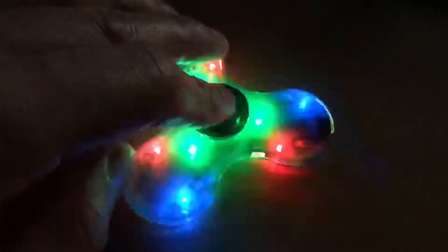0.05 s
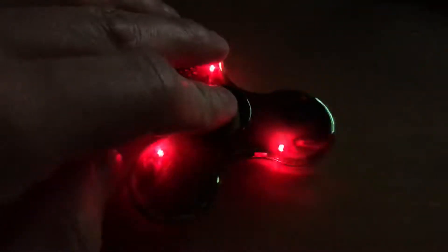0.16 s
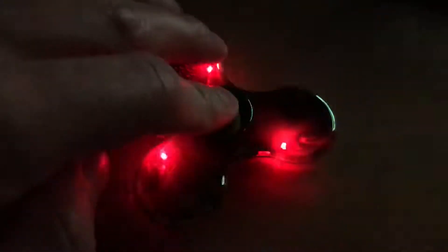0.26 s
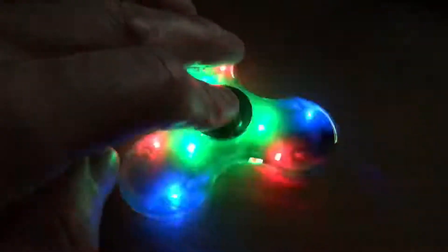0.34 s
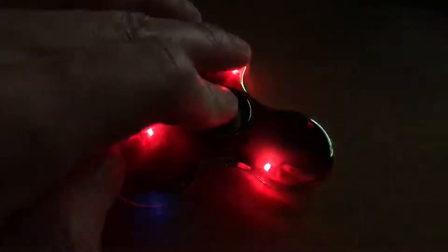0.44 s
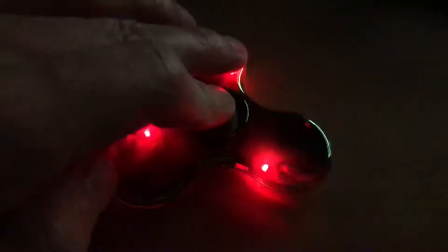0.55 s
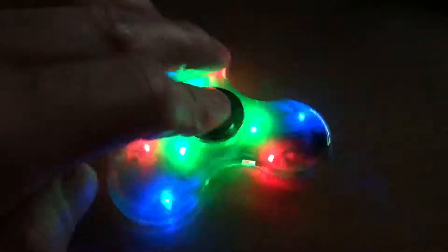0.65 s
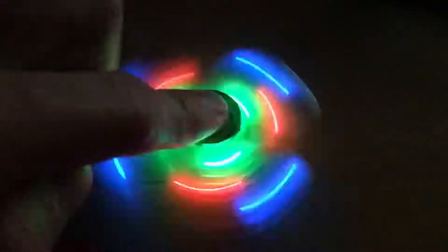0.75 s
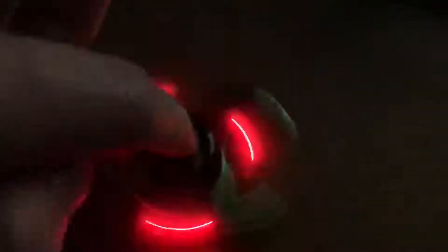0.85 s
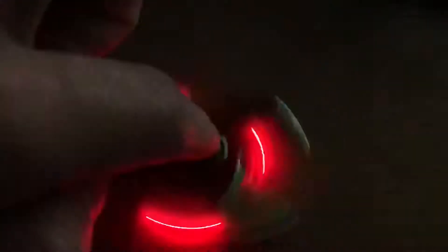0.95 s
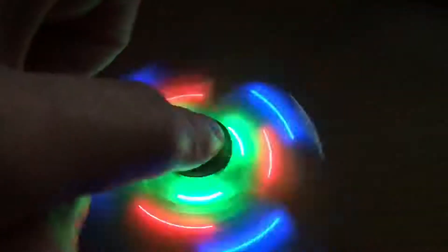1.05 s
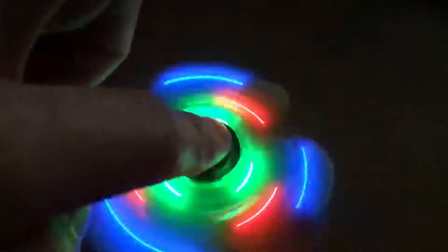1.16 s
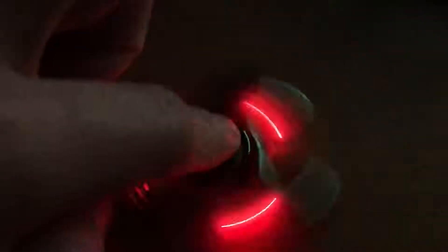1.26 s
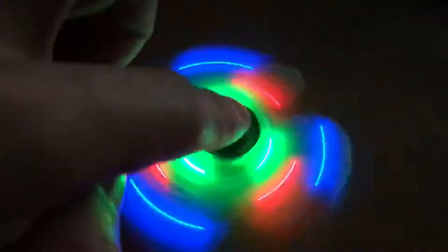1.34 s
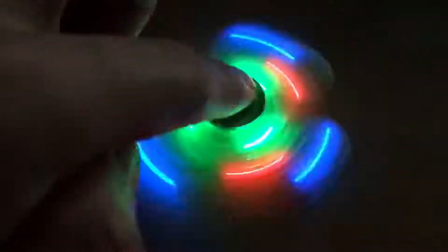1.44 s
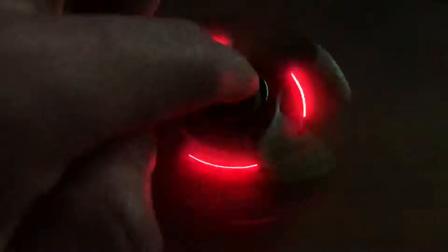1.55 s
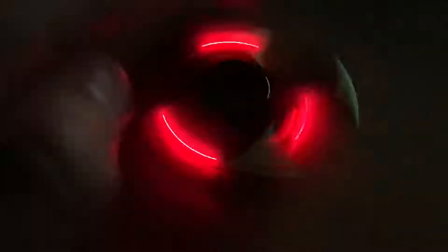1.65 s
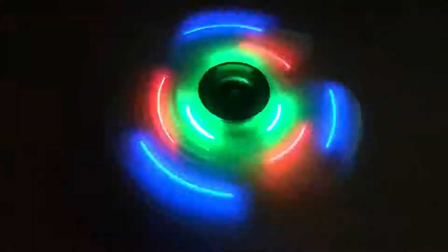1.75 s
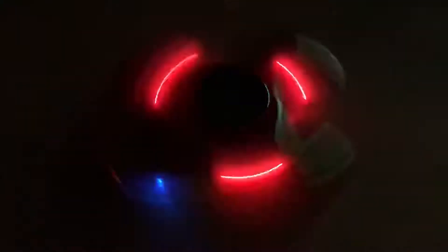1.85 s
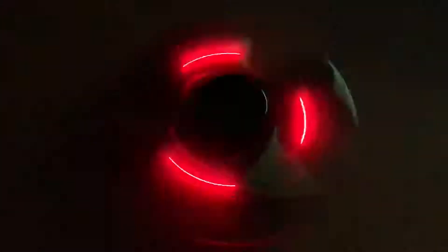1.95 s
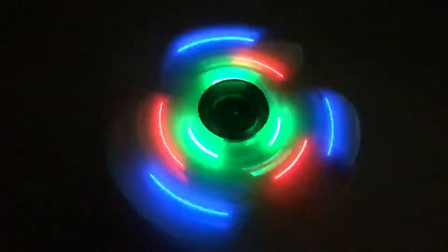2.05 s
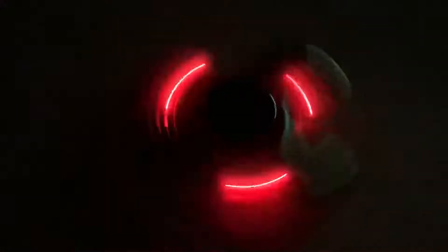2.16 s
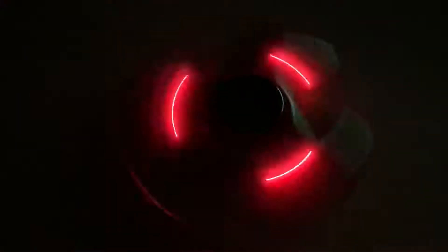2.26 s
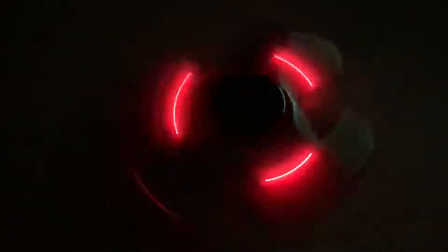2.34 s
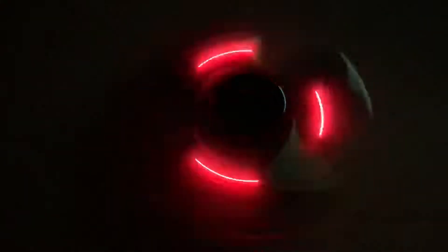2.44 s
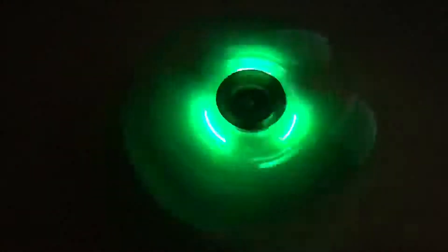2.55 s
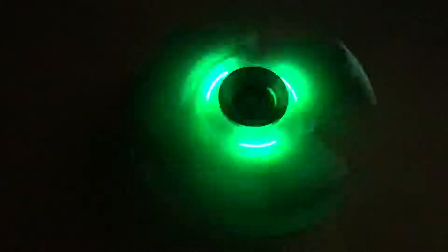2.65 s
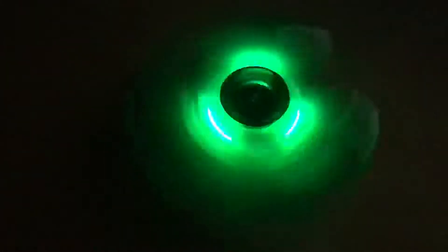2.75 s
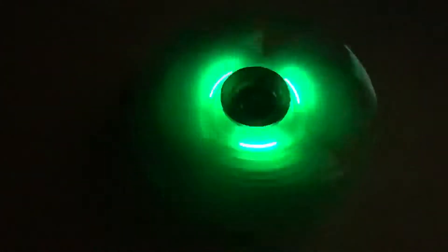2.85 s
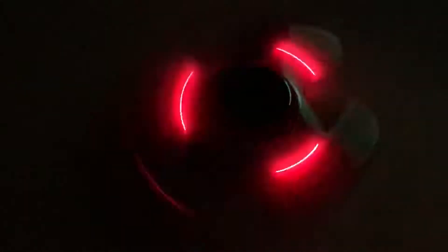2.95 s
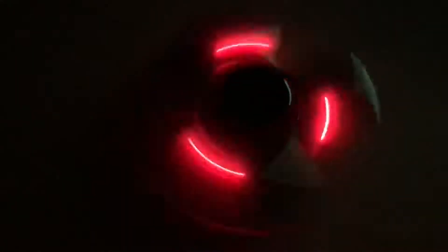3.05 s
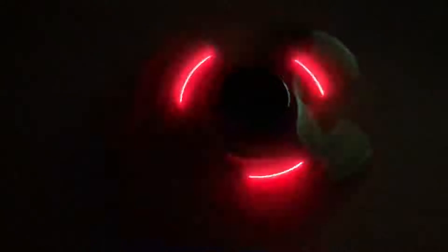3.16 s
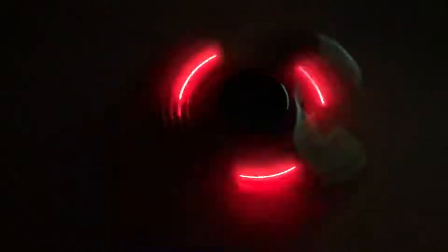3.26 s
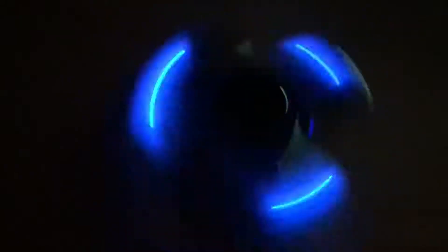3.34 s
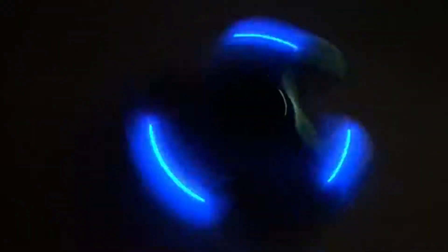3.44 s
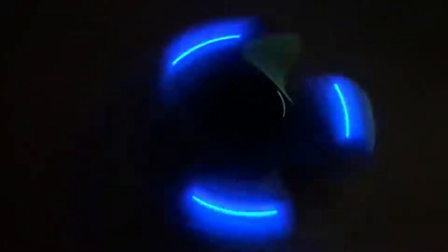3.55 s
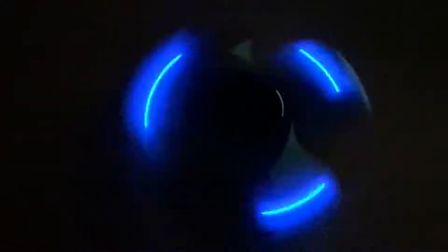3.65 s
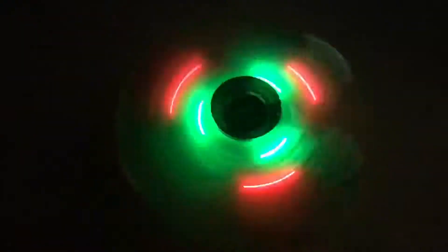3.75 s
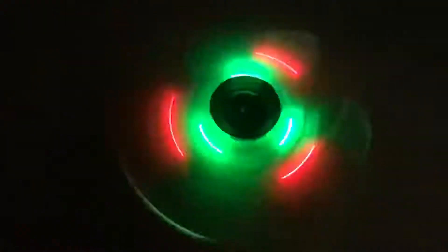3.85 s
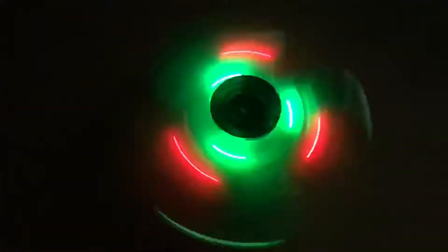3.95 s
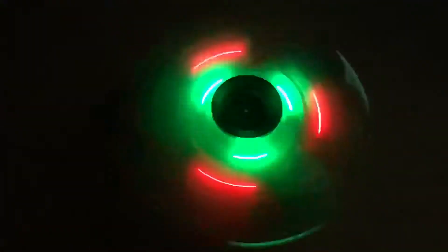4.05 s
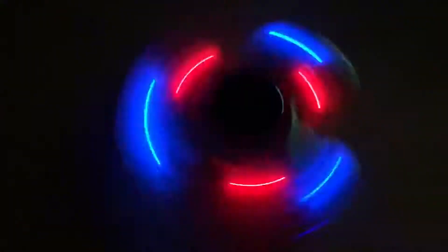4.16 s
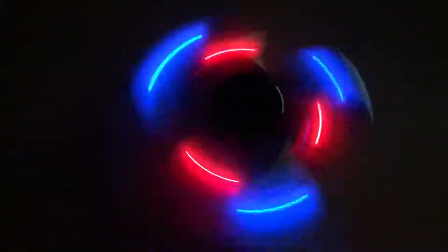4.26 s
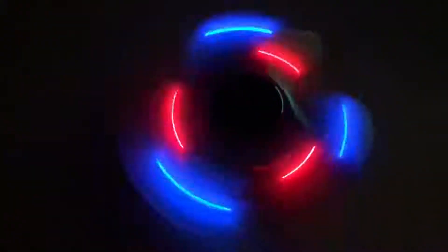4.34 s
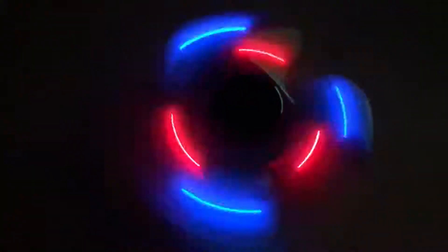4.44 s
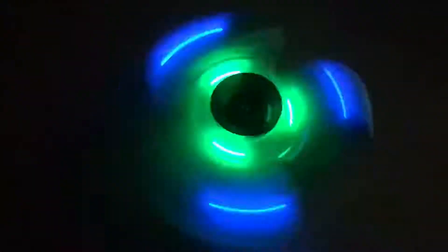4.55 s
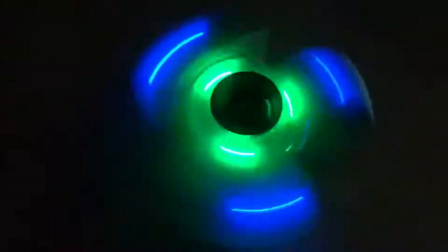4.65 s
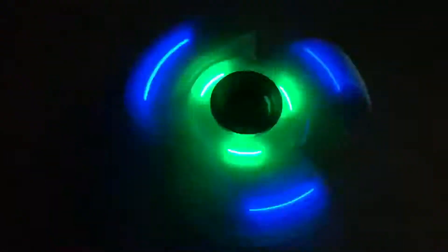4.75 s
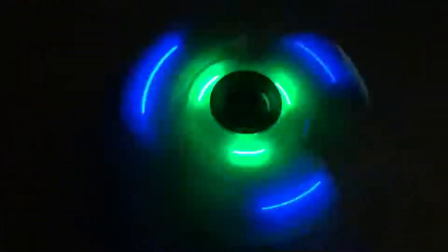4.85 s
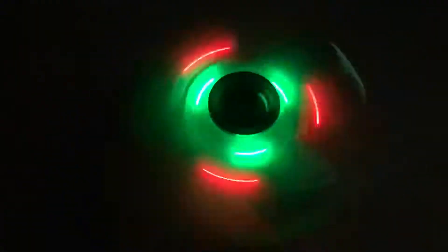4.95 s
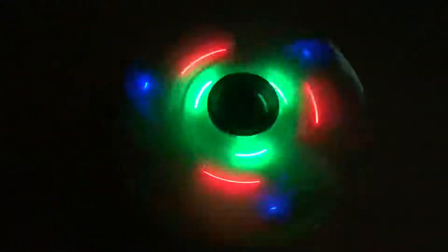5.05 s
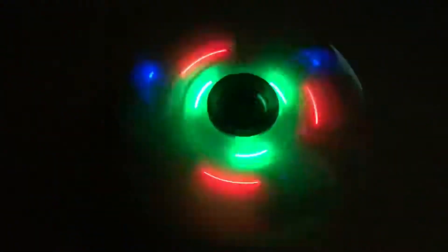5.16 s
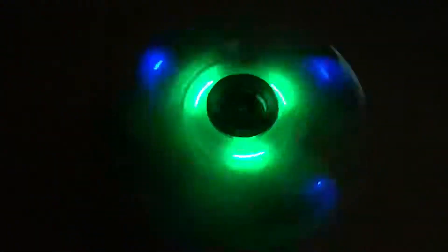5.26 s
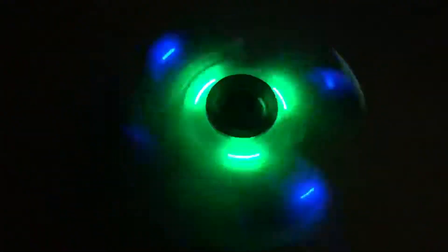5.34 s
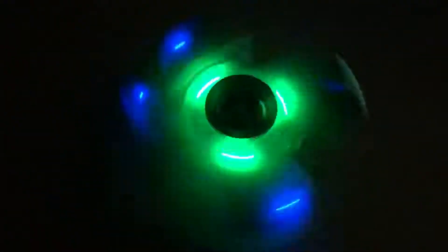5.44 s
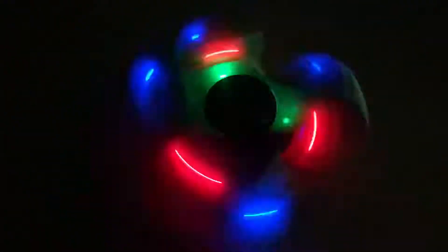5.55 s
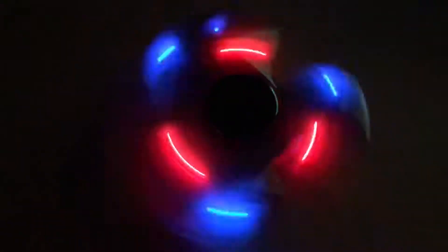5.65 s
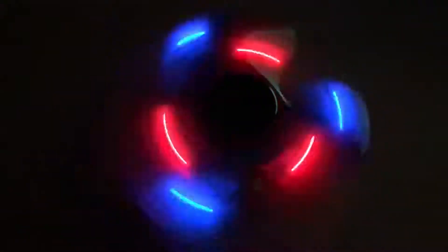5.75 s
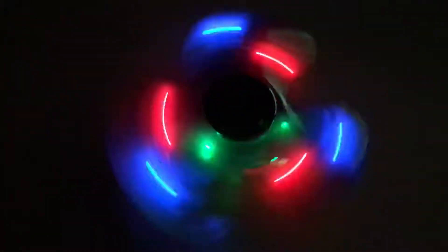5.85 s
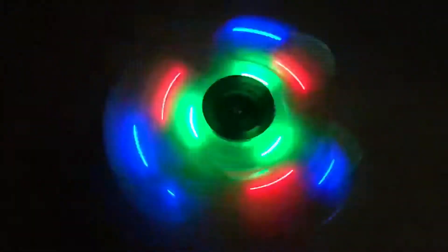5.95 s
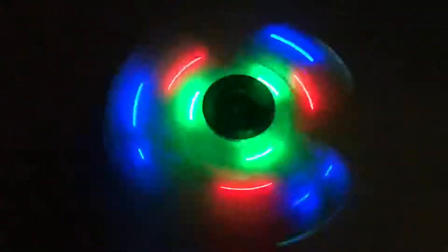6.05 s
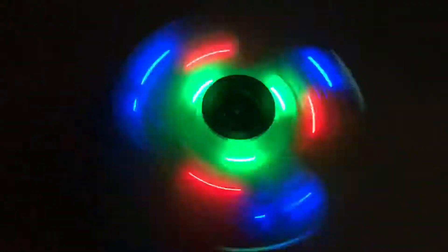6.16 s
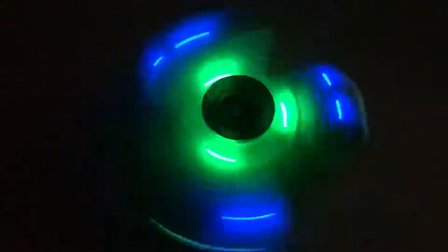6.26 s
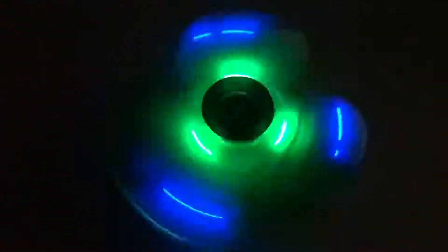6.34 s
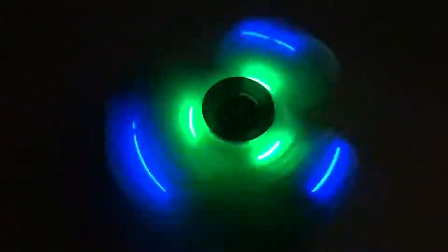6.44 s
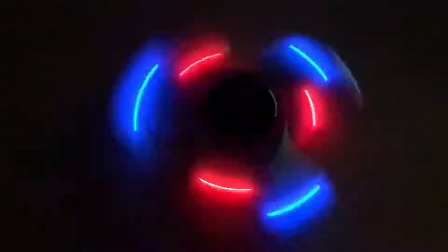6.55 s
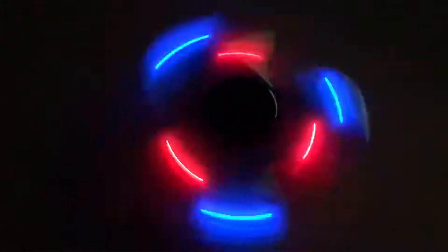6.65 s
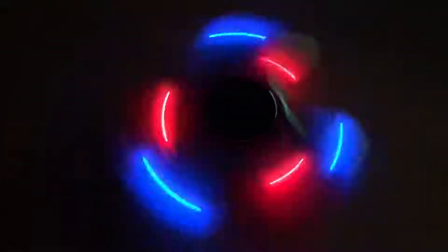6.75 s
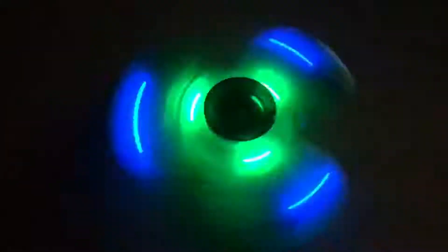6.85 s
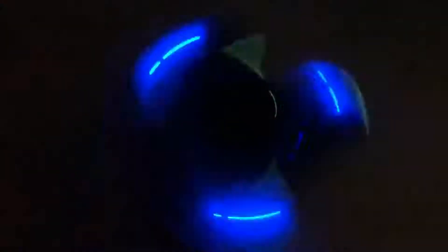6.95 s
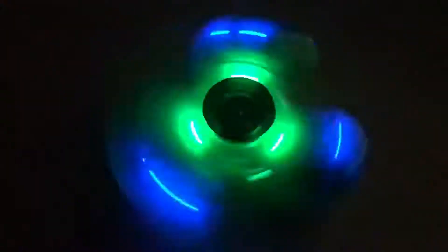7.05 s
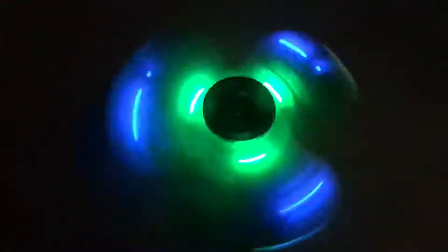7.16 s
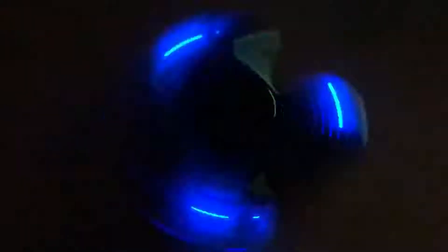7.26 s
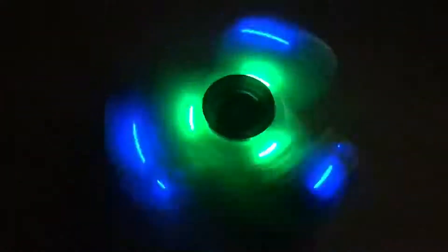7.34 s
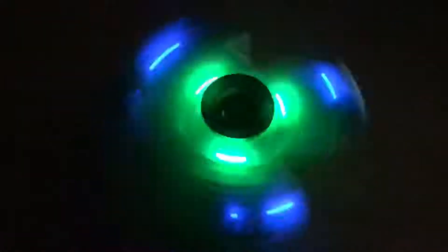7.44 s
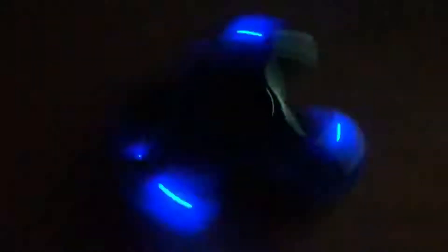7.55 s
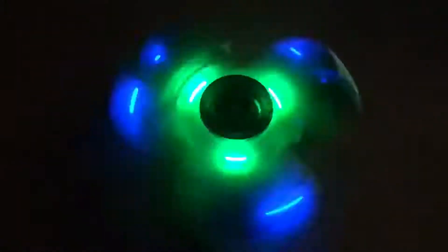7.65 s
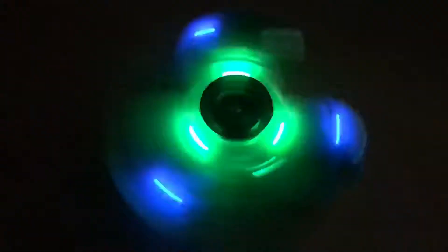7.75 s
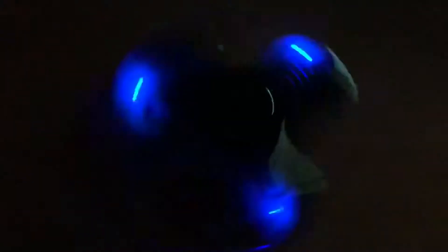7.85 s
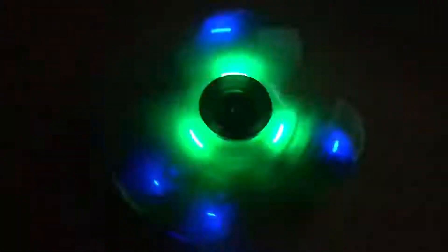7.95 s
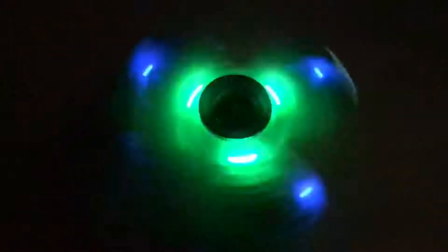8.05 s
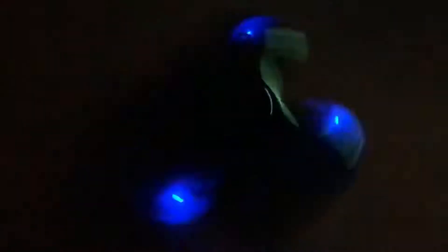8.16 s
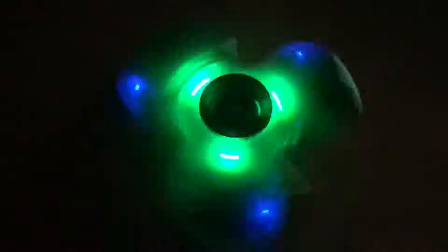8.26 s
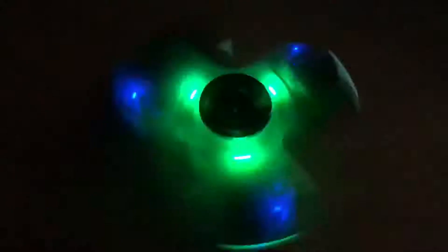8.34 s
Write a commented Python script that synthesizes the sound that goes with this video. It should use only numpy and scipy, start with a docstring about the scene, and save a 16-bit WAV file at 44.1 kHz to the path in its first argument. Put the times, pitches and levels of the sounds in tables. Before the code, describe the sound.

A quiet small room holds a soft low electric hum and faint noise. Very close, at about 0.6 seconds, a fingernail gives a faint bright tick on a plastic spinner, with another near 0.8. Immediately afterwards, around 0.82 to 0.86, a sharp snap and hard plastic clacks burst out, by far the loudest moment, with a dull thud in the hand. Short skin scuffs and low bumps follow until about 1.2. The bearing is already whirring: thin high metallic ringing, airy hiss and a fast flutter about twenty times a second. The thumb lets go around 1.6 and the plastic rattle becomes clearer, swelling slowly; a last brief rub and small clack come at 2.0. Until about 8.4 seconds the whir continues, warbling slightly, dotted with tiny irregular ticks, gradually slower, softer and less grinding, still turning at the end.

```python
"""A low electric hum in a quiet room; close to the microphone a fingernail taps a plastic fidget spinner, then flicks it.
The finger snaps off an arm (ringing modes), the body clacks and skin slides on the cap (bursts of coloured noise).
The ball bearing whirs on, fading as it slowly loses speed: balls tick over rough spots and the metal rings thinly.
The plastic body rattles twice a turn, damped under the thumb; once the thumb lets go, it rattles in slow swells."""
import sys
import numpy as np
from scipy import signal
from scipy.fft import rfft, irfft, next_fast_len
from scipy.io import wavfile
from scipy.ndimage import map_coordinates

SR = 44100
rng = np.random.default_rng(int(sys.argv[2]) if len(sys.argv) > 2 else 0)


def dump(signal):
    """Clip the signal to [-1, 1] and save it as 16-bit WAV at the path in sys.argv[1]."""
    limited = np.clip(np.atleast_2d(signal).T, -1, 1)
    pcm = np.round(limited * 32767).astype(np.int16)
    wavfile.write(sys.argv[1], SR, pcm)


N = 370440

# the flick starts the rotor; later the thumb comes off the cap; both changes ramp in
FLICK_S, LET_GO_S, CHANGE_S = .84, 1.606, 0.036

# cycles of the turning rotor: (rate [times per turn], place of the peak in its cycle [0-1])
# its lean, its rocking, the grazing of the balls, and the beat of the rocking with the passing balls
LEAN, ROCK, GRAZE, BEAT = (1, .89), (2, .655), (2, .41), (2.885, .55)
# the ring's pitch swings once and twice a turn, each by a share of the playing speed
WARBLE_ONCE, WARBLE_TWICE = (1, .21), (2, .8)
WARBLE_ONCE_SHARE, WARBLE_TWICE_SHARE = .015, 0.0092
# eight balls load the inner race, and pass a spot on the inner and on the outer race
INNER_LOAD, INNER_PASS, OUTER_PASS = (4.885, .94), (4.885, .03), (3.115, .06)

# sounds that grow with speed: (level at the cruising speed [dB], rise for each turn per s [dB])
CRUISE_TURNS_PER_S = 10
RING_LEVEL, HISS_LEVEL, SKID_LEVEL = (-55.5, 0.87), (-57.5, 1.2), (-78, 5)
LOW_RATTLE_LEVEL, HIGH_RATTLE_LEVEL = (-64.5, 0.14), (-62.5, 1.17)
# while the thumb holds the cap it damps the rattle and the hiss
HELD_LOW_DB, HELD_HIGH_DB, HELD_HISS_DB = -2, -7.5, -2
# the free toy wobbles slowly, and the rattle swells with it: (rate [times per s], place of the peak [0-1])
WOBBLE = (1.36, .28)
WOBBLE_DB = 1.5
# letting go jogs the toy: the upper rattle is louder at first, by at most this, and settles
JOG_DB, SETTLE_S = 3, 0.47
# now and then a passing ball catches and gives a light tick; the level is that of its kick
CATCH_CHANCE, CATCH_DB = .06, -40

# resonances of the bearing: (frequency [Hz], width [Hz], relative level [dB])
BEARING_MODES = [(3088, 190, -10), (3180, 160, -12), (3732, 137, -4), (4100, 170, -12), (4160, 190, -13),
                 (4504, 154, 5.5), (4900, 150, -4)]
# a ball's impact loads the race, which answers lower: (frequency [Hz], width [Hz], relative level [dB])
LOADED_RACE_MODES = [(4075, 190, -5.5)]
# colour of the rolling hiss: (frequency [Hz], relative density [dB per Hz])
HISS_COLOUR = [(500, -24), (2700, -12.5), (4300, -9), (5200, -2.5), (6200, 2), (7000, -2), (7700, -11.5),
               (8300, -5.5), (9500, -8.5), (10500, -16), (11700, -15.5), (13000, -15.5), (14600, -12),
               (16000, -19)]
# colour of a dull thud in the hand: (frequency [Hz], relative density [dB per Hz])
THUD_COLOUR = [(20, -37), (32, -15), (60, -13), (160, 0.5), (300, -4), (500, -9.5), (900, -21), (2000, -34),
               (6000, -58)]


def from_db(db):
    """Decibels to gain."""
    return 10 ** (np.asarray(db) / 20)


def rms_one(x):
    """Scale to an rms of 1."""
    return x / np.sqrt(np.mean(x ** 2) + 1e-20)


def in_time(rows):
    """Each column of a curve at every sample."""
    s, *columns = np.transpose(rows)
    return [np.interp(np.arange(N) / SR, s, c) for c in columns]


def after(s):
    """A quick ramp from 0 to 1 that starts at the given time."""
    return np.clip((np.arange(N) / SR - s) / CHANGE_S, 0, 1)


def drift(rate):
    """A smooth random curve of rms 1 that changes about rate times a second."""
    knots = np.arange(N) / SR * rate
    return rms_one(np.interp(knots, np.arange(4096), rng.standard_normal(4096)))


def edge(x, hz, kind):
    """Butterworth high- or low-pass."""
    sos = signal.butter(N=4, Wn=min(hz, .45 * SR), btype=kind, fs=SR, output="sos")
    return signal.sosfilt(sos, x)


def coloured(x, spectrum):
    """Causal filter with the shape of the given spectrum; white noise keeps its power."""
    size = 2 * next_fast_len(N // 2 + SR // 10)
    hz, db = np.transpose(spectrum)
    bins = np.fft.rfftfreq(size, 1 / SR)
    gain = rms_one(from_db(np.interp(np.log(bins + 1), np.log(hz), db)))
    # the folded cepstrum gives the minimum phase
    cepstrum = irfft(np.log(gain))[:size // 2]
    response = np.exp(2 * rfft(cepstrum, size) - cepstrum[0])
    return irfft(rfft(x, size) * response)[:N]


def resonate(x, modes):
    """Parallel two-pole resonances of alternating sign."""
    out = np.zeros(N)
    for k, (hz, width, db) in enumerate(modes):
        r = np.exp(-np.pi * width / SR)
        poles = [1, -2 * r * np.cos(2 * np.pi * hz / SR), r * r]
        gain = (-1) ** k * from_db(db) * (1 - r * r) / 2
        out += gain * signal.lfilter([1, 0, -1], poles, x)
    return out


def grit(per_s, spread_db):
    """Tiny contacts at random moments, of uneven size; rms 1."""
    sizes = from_db(spread_db * np.minimum(rng.exponential(1, N), 4)) * rng.choice([-1, 1], N)
    return rms_one(sizes * (rng.random(N) < per_s / SR))


def clicks_at(rows):
    """One click for each (time [s], level [dB])."""
    out = np.zeros(N)
    for s, db in rows:
        out[round(s * SR)] = from_db(db)
    return out


def scrapes(kicks, length_s):
    """Each kick starts a brief decaying burst of friction noise."""
    decay = np.exp(-1 / (length_s * SR))
    # the tiny offset keeps the filter clear of denormal numbers
    return signal.lfilter([1], [1, -decay], kicks + 1e-18) * rng.choice([-1, 1], N)


def swing(position, cycle):
    """A load between -1 and 1 that recurs as the position (turns or seconds) advances."""
    rate, place = cycle
    return np.cos(2 * np.pi * (rate * position - place))


def at_speed(level, speed):
    """Level in dB of a sound that grows with the rotor's speed."""
    cruise_db, slope_db = level
    return cruise_db + slope_db * (speed - CRUISE_TURNS_PER_S)


def room(x, wet_db):
    """A short diffuse tail of decaying noise follows the close sound."""
    t60_s = 0.12
    age = np.arange(SR // 2) / SR
    tail = rng.standard_normal(len(age)) * 1000 ** (-age / t60_s) * (age > .002)
    tail = signal.lfilter(*signal.butter(1, 9000, fs=SR), tail)
    return x + from_db(wet_db) * signal.fftconvolve(x, tail / np.linalg.norm(tail))[:N]


def background():
    """Mains hum and a wavering low drone over the room's soft noise."""
    # hum lines: (frequency [Hz], width [Hz], level [dB])
    hum_lines = [(120.2, 0.31, -60.5), (179.8, 1.46, -64), (254.2, 9.9, -60)]
    # colour of the room's noise: (frequency [Hz], relative density [dB per Hz])
    room_colour = [(20, -31), (35, -3.5), (48, 1.5), (80, -3.5), (150, -0.5), (280, 5.5), (330, -4),
                   (370, 1.5), (480, -9.5), (560, -4), (690, -4), (800, -16), (1500, -19), (5200, -28),
                   (16000, -32.5)]
    t = np.arange(N) / SR
    out = from_db(-59) * coloured(rng.standard_normal(N), room_colour)
    for hz, width, db in hum_lines:
        unsteady = np.clip(width / 8, 0, 1)   # the wider a line, the less of it is a steady tone
        sway = 1 - unsteady + unsteady * (drift(2 * width) + 1j * drift(2 * width))
        out += from_db(db) * rms_one(np.real(sway * np.exp(2j * np.pi * hz * t)))
    return out


def nail():
    """A nail taps faintly as the finger finds its place; clicks excite damped resonances."""
    # a fingernail touches the arm before the flick: (time [s], level of the click [dB])
    nail_taps = [(.5768, -14.5), (.585, -26), (.795, -17)]
    # its resonances: (frequency [Hz], width [Hz], relative level [dB])
    nail_modes = [(5350, 290, 5), (7000, 700, -6.5), (13500, 4500, -14.5)]
    return resonate(clicks_at(nail_taps), nail_modes)


def touch():
    """Each rub swells and dies away; together they give sliding gain, rumble gain and bearing load in dB."""
    # fingers rub the cap: (peak time [s], rise [s], decay [s], sliding [dB],
    # low handling rumble [dB], extra load on the bearing [dB])
    rubs = [(0.852, 0.011, 0.028, -55, -38, 5), (0.896, 0.0056, 0.029, -48.5, -59, 12.5),
            (.962, 0.019, .02, -45.5, -47.5, 2.5), (1.095, .014, .022, -47, -45.5, 8.5),
            (1.16, 0.034, 0.046, -62, -52.5, -3), (1.51, 0.16, 0.096, -56.5, -79, 2),
            (1.998, 0.01, .018, -41, -53, 3), (2.13, 0.027, 0.053, -72, -62, 2)]
    t = np.arange(N) / SR
    slide, rumble, load_db = np.zeros((3, N))
    for s, rise_s, decay_s, slide_db, rumble_db, press_db in rubs:
        fall = np.where(t < s, ((s - t) / rise_s) ** 2 / 2, (t - s) / decay_s)
        pressure = np.exp(-np.minimum(fall, 20))
        slide += from_db(slide_db) * pressure
        rumble += from_db(rumble_db) * pressure
        load_db += press_db * pressure
    return slide, rumble, load_db


def fingers(slide, rumble):
    """Skin sticks and slips over the cap and jostles the toy."""
    # colour of skin sliding on plastic: (frequency [Hz], relative density [dB per Hz])
    skin_colour = [(200, -7), (1000, -8.5), (2000, -4), (4000, 0.5), (6500, -7), (9000, -6.5), (10700, -12),
                   (12500, -5), (14500, -8), (16000, -22)]
    slips = grit(per_s=2200, spread_db=4.5) * rms_one(from_db(3.6 * drift(110)))
    sliding = slide * coloured(slips, skin_colour)
    return sliding + rumble * coloured(rng.standard_normal(N), THUD_COLOUR)


def clacks():
    """Each knock is a brief chatter of plastic with a bright top and a dull thud in the hand."""
    # plastic clacks: (time [s], level of the burst [dB], t60 [s], thud relative to the clack [dB])
    clack_rows = [(0.8186, -29.5, 0.035, -11), (0.8424, -14, 0.022, -11), (0.8487, -23, 0.035, -19),
                  (0.8558, -10.5, 0.0048, -24), (0.8628, -40, 0.037, 6), (0.8766, -38, 0.054, 3.5),
                  (1.0554, -33.5, 0.02, -10), (1.985, -41, 0.027, -11)]
    # colour of a clack: (frequency [Hz], relative density [dB per Hz])
    clack_colour = [(200, -9.5), (700, -1.5), (1300, -5), (2000, -6.5), (3000, -8), (3700, -4), (4500, 3),
                    (5000, -4), (5600, 3.5), (7300, -14.5), (10000, -12.5), (12000, -11), (16000, -13)]
    chatter, thud, top = np.zeros((3, N))
    age = np.arange(SR // 5) / SR
    for s, db, t60, thud_db in clack_rows:
        start = round(s * SR)
        span = slice(start, start + len(age))
        burst = from_db(db) * 1000 ** (-age / t60) * rng.choice([-1, 1], (3, len(age)))
        chatter[span] += burst[0]
        top[span] += burst[1]
        thud[span] += from_db(thud_db) * burst[2]
    bright = from_db(-7) * edge(top, 9400, "high")
    return coloured(chatter, clack_colour) + coloured(thud, THUD_COLOUR) + bright


def snap():
    """The flick sets the arm ringing for a few milliseconds in decaying sine modes."""
    # the finger snaps off the arm, which springs back against the cap: (time [s], level of the click [dB])
    snap_clicks = [(.8175, -3), (.8183, -12), (.829, -22), (.8419, -38), (.8558, -23)]
    # modes of the flicked arm: (frequency [Hz], relative level [dB], t60 [s])
    arm_modes = [(627, -17.5, 0.04), (990, -38, 0.0074), (2350, -13.5, 0.0026), (3150, -3.5, 0.01),
                 (3630, -9, 0.0069), (4540, -5, 0.0086), (6560, -9, 0.0034), (8460, -9, 0.0054)]
    clicks, out = clicks_at(snap_clicks), np.zeros(N)
    for k, (hz, db, t60) in enumerate(arm_modes):
        r, w = 1000 ** (-1 / (t60 * SR)), 2 * np.pi * hz / SR
        ringing = signal.lfilter([0, np.sin(w)], [1, -2 * r * np.cos(w), r * r], clicks + 1e-18)
        out += (-1) ** k * from_db(db) * ringing
    return out


def rattle(turns, low_db, high_db):
    """The rotor rocks in its play: twice a turn, once harder, it knocks and rubs on the plastic body."""
    # lower resonances of the plastic body: (frequency [Hz], width [Hz], relative level [dB])
    low_modes = [(630, 100, -12), (904, 29, -11.5), (1109, 31, -1.5), (1210, 51, -3.5), (1343, 102, -5.5)]
    # upper resonances of the plastic body: (frequency [Hz], width [Hz], relative level [dB])
    high_modes = [(1662, 29, -2.5), (1750, 92, -7), (1898, 55, 2), (2192, 68, -2.5), (2390, 120, -7)]
    rocking = swing(turns, ROCK) + 0.29 * swing(turns, LEAN)
    rocking += 0.5 * swing(turns, INNER_LOAD) + 0.26 * swing(turns, BEAT)
    # only rocking beyond the gap of .3 presses on the body
    press = np.maximum(rocking + 0.13 * drift(45) - .3, 0)
    knocks = np.zeros(N)
    peaks = signal.find_peaks(rocking)[0]
    knocks[peaks] = from_db(16) * np.sqrt(press[peaks])
    contacts = grit(per_s=9000, spread_db=0.5)
    low = resonate(knocks + contacts * (0.93 * press + 0.26), low_modes)
    low = rms_one(edge(low, 1530, "low"))
    high = resonate(knocks + contacts * (0.67 * press + 0.35), high_modes)
    high = rms_one(edge(edge(high, 1550, "high"), 2500, "low"))
    return from_db(low_db) * low + from_db(high_db) * high


def passes(turns, cycle, scatter):
    """A unit click each time a ball reaches a rough spot of a race."""
    per_turn, place = cycle
    passed = np.floor(per_turn * turns - place + scatter * drift(40))
    passed = np.maximum.accumulate(passed)   # the scatter never counts a ball twice
    return np.diff(passed, prepend=passed[0])


def ball_ticks(passing, uneven_db, length_s):
    """A short scrape of uneven strength for each passing ball; rms 1."""
    strength = from_db(uneven_db * np.clip(rng.standard_normal(N), -2, 1.3))
    return rms_one(scrapes(passing * strength, length_s))


def warble(ring, turns):
    """The shifting load tightens and slackens the race, so its ring rises and falls in pitch as it turns."""
    stretch = WARBLE_ONCE_SHARE * swing(turns, WARBLE_ONCE)
    stretch += WARBLE_TWICE_SHARE * swing(turns, WARBLE_TWICE)
    return map_coordinates(ring, [np.arange(N) + np.cumsum(stretch)], order=3)


def races(turns, ring_db, hiss_db):
    """The metal races hiss and ring under the rolling balls and at every tick."""
    inner = ball_ticks(passes(turns, INNER_PASS, scatter=.035), uneven_db=1.0, length_s=0.0013)
    outer = ball_ticks(passes(turns, OUTER_PASS, scatter=.064), uneven_db=2.0, length_s=0.0018)
    graze_db = 0.97 * swing(turns, GRAZE) + 1.0 * drift(70)
    ticks = from_db(-3.0) * inner + from_db(-2.5) * outer
    rolling = grit(per_s=9700, spread_db=1.0) + ticks
    rolling *= from_db(graze_db + 1.36 * swing(turns, LEAN))
    ring = resonate(rolling, BEARING_MODES) + resonate(ticks, LOADED_RACE_MODES)
    ring = rms_one(edge(warble(ring, turns), 5600, "low"))
    friction = grit(per_s=8200, spread_db=-0.5) + from_db(-6.5) * inner + from_db(-7.0) * outer
    hiss = rms_one(coloured(friction * from_db(graze_db), HISS_COLOUR))
    return from_db(ring_db) * ring + from_db(hiss_db) * hiss


def hard_ticks(turns):
    """A ball strikes the race hard at set times, or lightly when it catches on the outer rough spot."""
    # the hardest ball ticks: (time [s], level of the kick [dB])
    hard_rows = [(1.459, -28.5), (1.753, -29), (2.5146, -33), (2.8409, -37), (3.0344, -31), (3.179, -29),
                 (3.3198, -38), (3.4094, -34), (3.5208, -35), (4.9455, -36), (5.2297, -34), (7.4504, -34),
                 (7.7557, -36), (7.968, -37)]
    caught = passes(turns, OUTER_PASS, scatter=.064) * (rng.random(N) < CATCH_CHANCE)
    kicks = clicks_at(hard_rows) + caught * from_db(CATCH_DB)
    hard = scrapes(kicks, length_s=0.002)
    ring = from_db(6.5) * resonate(hard, BEARING_MODES + LOADED_RACE_MODES)
    return ring + from_db(-13) * coloured(hard, HISS_COLOUR)


def skid(level_db):
    """At high speed the balls skid a little: a broad grinding that fades faster than the ring."""
    grinding = rms_one(resonate(grit(per_s=1900, spread_db=8.0), [(3100, 1200, 0)]))
    return from_db(level_db) * edge(grinding, 4200, "low")


def bearing(load_db):
    """The rotor's angle sets the rhythm; its speed, its wobble and the fingers' load set the levels."""
    # rotor speed: (time [s], speed [turns per s])
    spin_curve = [(0.84, 12.6), (2, 12.174), (3, 11.825), (4, 10.743), (5, 10.126), (6, 9.47), (7, 8.886),
                  (8.4, 8.085)]
    t = np.arange(N) / SR
    speed, = in_time(spin_curve)
    turns = np.cumsum(speed) / SR
    held = 1 - after(LET_GO_S)
    wobble_db = WOBBLE_DB * (1 - held) * swing(t, WOBBLE)
    jog_db = JOG_DB * (1 - held) * np.exp(-np.abs(t - LET_GO_S) / SETTLE_S)
    low_db = at_speed(LOW_RATTLE_LEVEL, speed) + wobble_db + HELD_LOW_DB * held
    high_db = at_speed(HIGH_RATTLE_LEVEL, speed) + wobble_db + HELD_HIGH_DB * held + jog_db
    ring_db = at_speed(RING_LEVEL, speed) + load_db
    hiss_db = at_speed(HISS_LEVEL, speed) + load_db + HELD_HISS_DB * held
    skid_db = at_speed(SKID_LEVEL, speed) + load_db
    whir = rattle(turns, low_db, high_db) + races(turns, ring_db, hiss_db)
    return after(FLICK_S) * (whir + hard_ticks(turns) + skid(skid_db))


def scene():
    """The toy and the hand, close by, each with its share of the room."""
    slide, rumble, load_db = touch()
    hand = room(clacks() + fingers(slide, rumble), wet_db=-7.5)
    flick = room(nail() + snap(), wet_db=-16.5)
    toy = room(bearing(load_db), wet_db=-18.0)
    return (background() + hand + flick + toy)[None]


def record(dry):
    """A steep elliptic low-pass cuts the top above 15850 Hz."""
    return signal.sosfilt(signal.ellip(10, .2, 80, 15850, fs=SR, output="sos"), dry)


dry = scene()
out = record(dry)
dump(out)
```